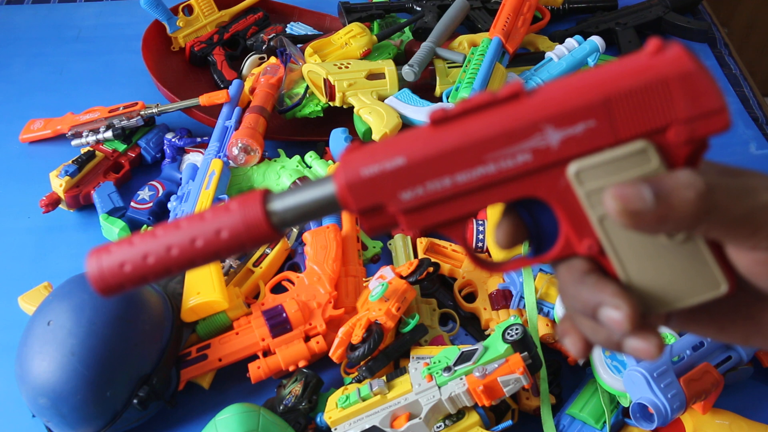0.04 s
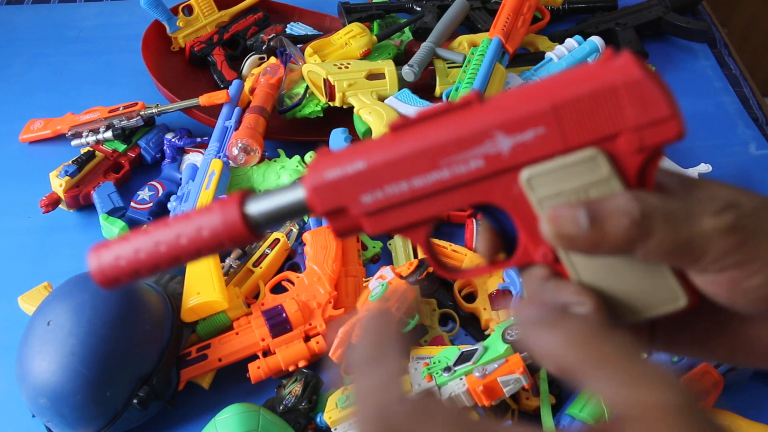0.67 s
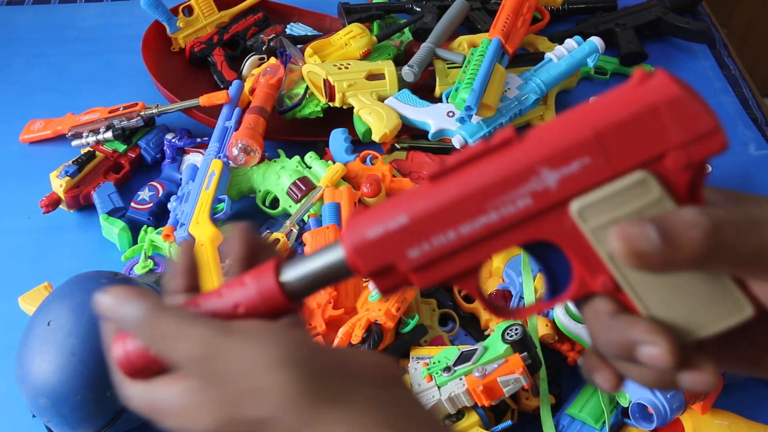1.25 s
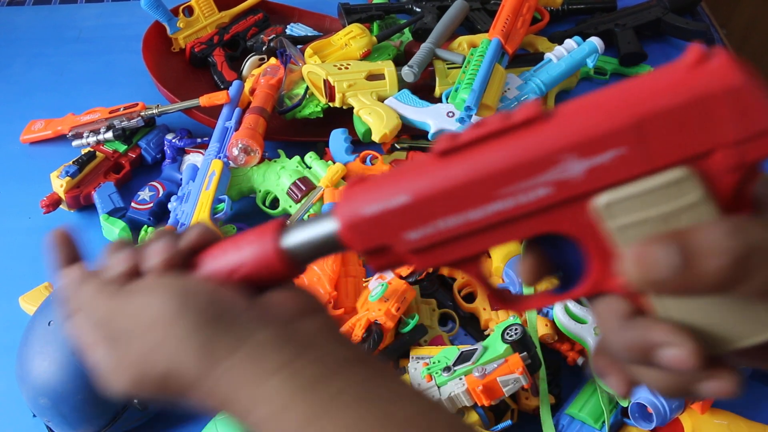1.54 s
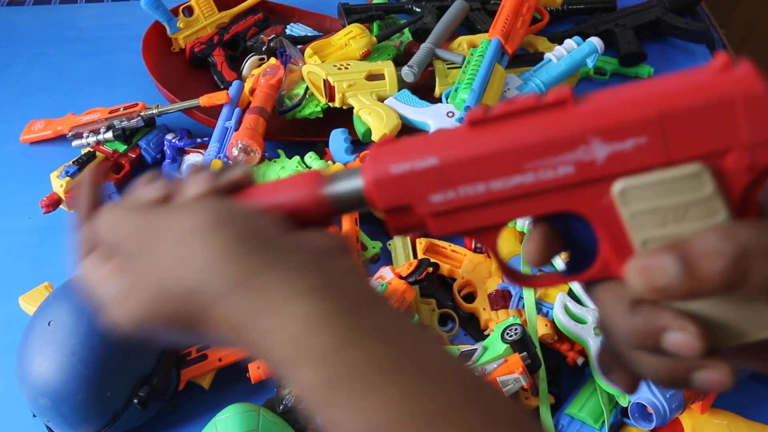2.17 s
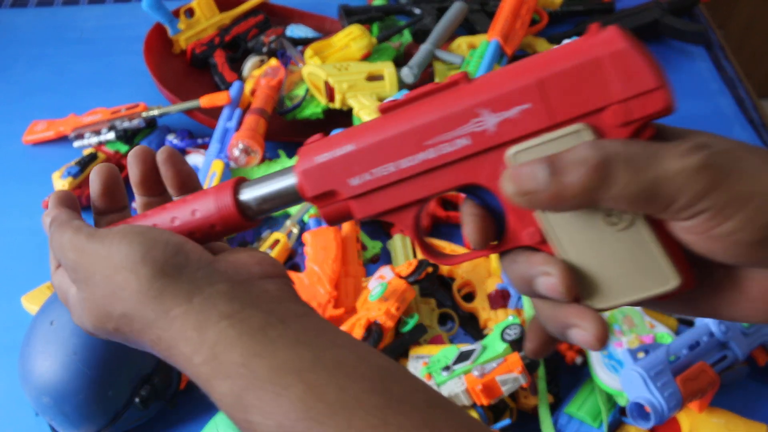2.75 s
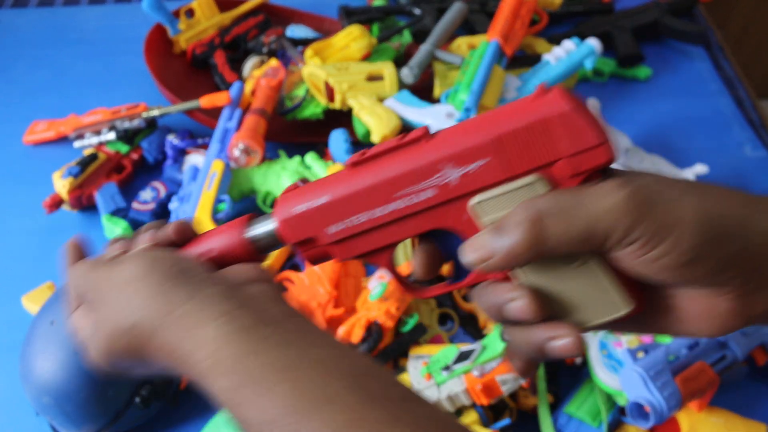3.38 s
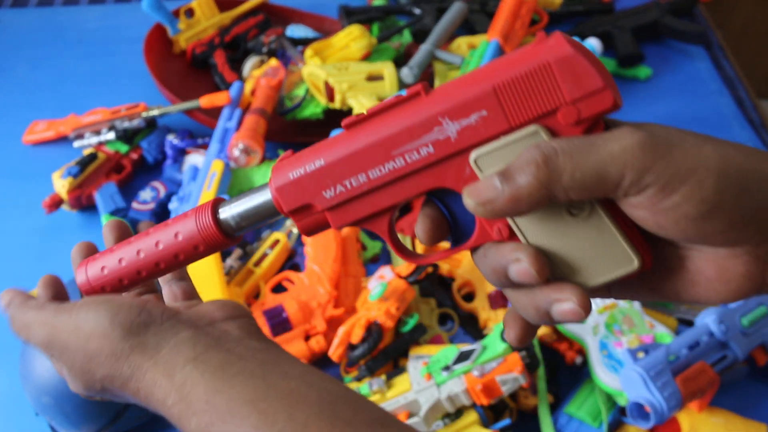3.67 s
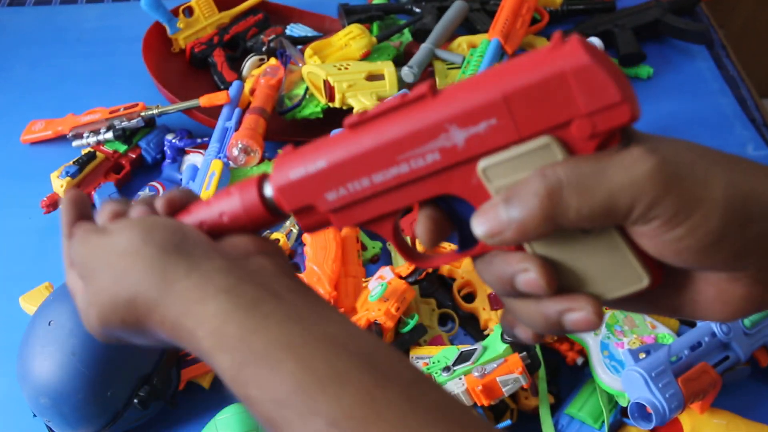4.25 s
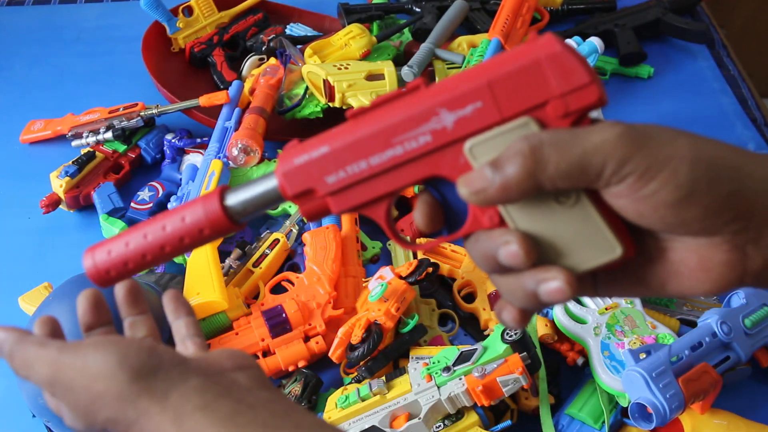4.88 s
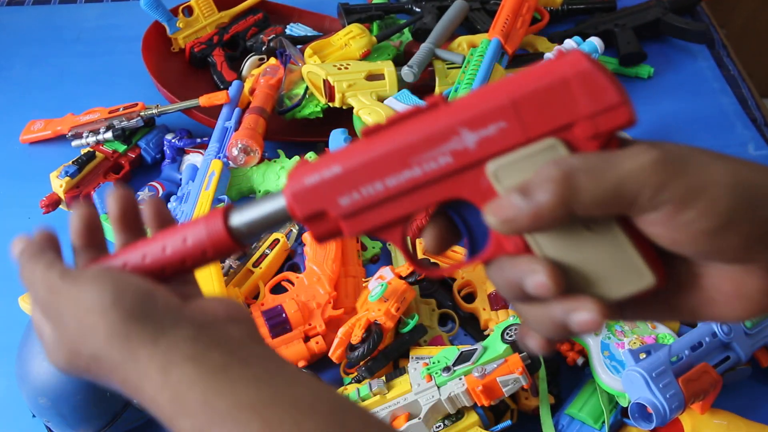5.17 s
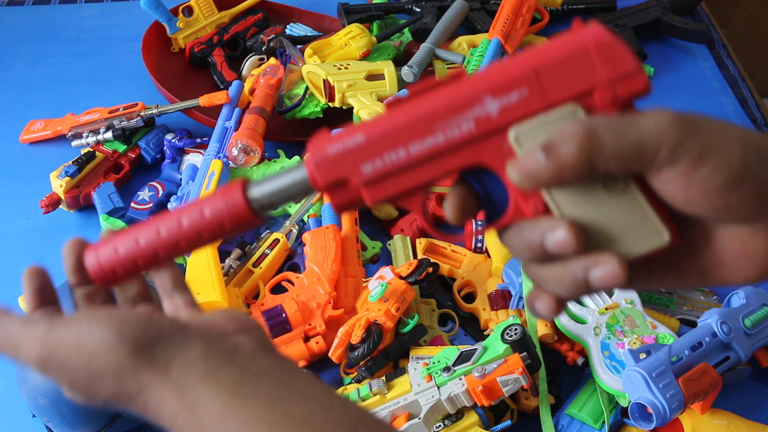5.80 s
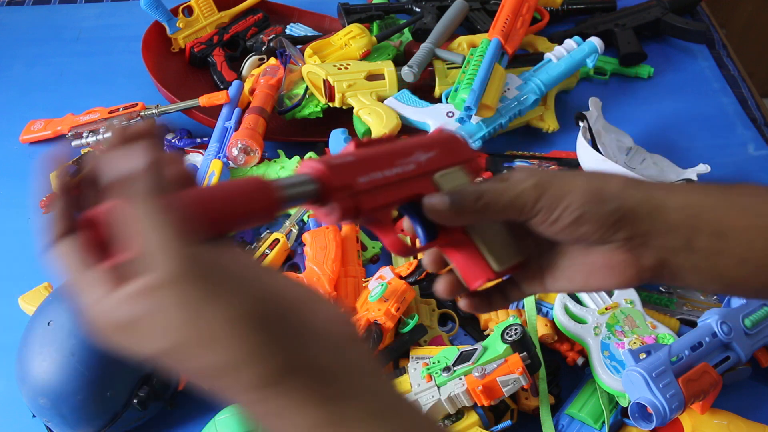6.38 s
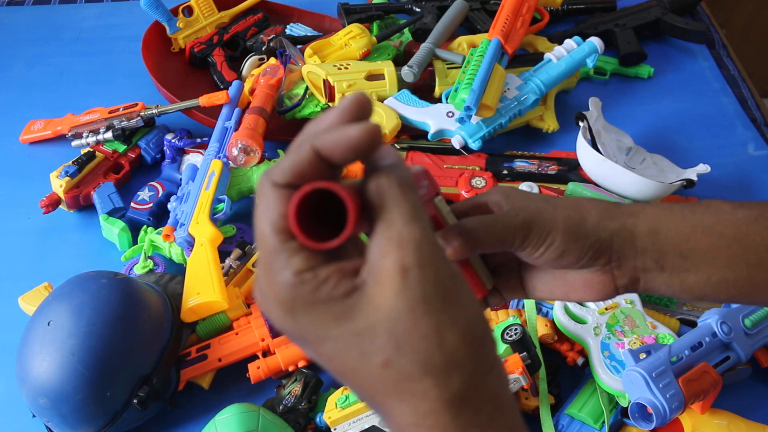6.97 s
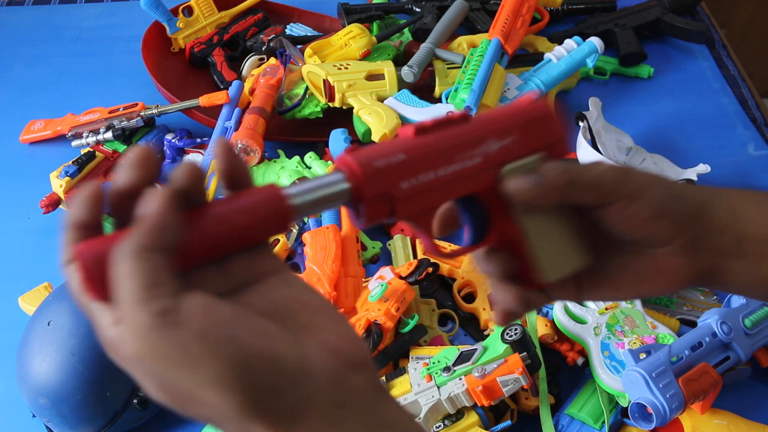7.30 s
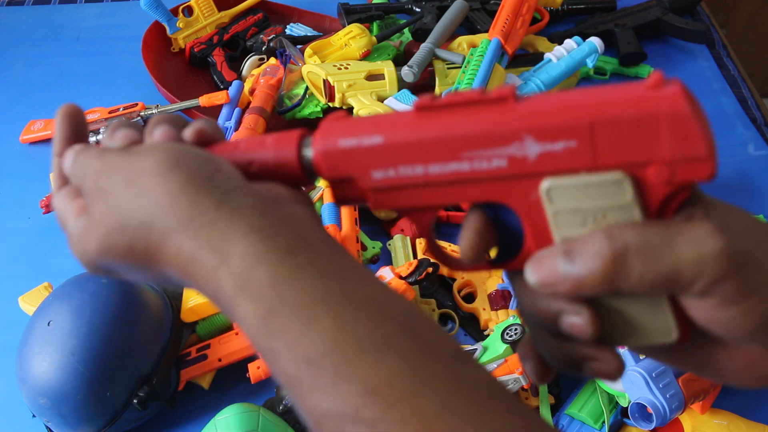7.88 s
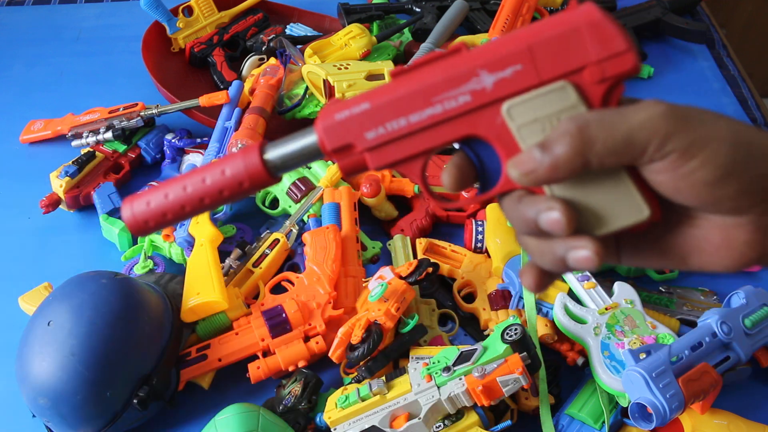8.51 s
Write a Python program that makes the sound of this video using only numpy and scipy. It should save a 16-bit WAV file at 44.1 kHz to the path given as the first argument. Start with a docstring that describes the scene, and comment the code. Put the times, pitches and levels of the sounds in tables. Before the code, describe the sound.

Close to the microphone in a faintly humming room, a toy spring pistol gives a few tiny clicks and two empty trigger snaps. Then come four rounds of hollow plastic clacks as the slide rubs back and forward, each ending in a sharp, loud shot with a brief echo. After some soft handling clicks, the trigger snaps empty again and the slide is pumped once more.

```python
"""A plastic spring pistol close to a stereo microphone in a faintly humming, hard-walled room.
Small dry clicks come first, then the trigger snaps twice on an uncocked spring.
The slide rubs and knocks back twice, runs forward, and a shot slams the piston home.
Three times more it is pumped, latches and fires; an empty snap and a last pump follow.
The limiter ducks on each loud blow and lifts the echo as it recovers."""
import sys
import numpy as np
from scipy import signal
from scipy.fft import rfft, irfft, next_fast_len
from scipy.io import wavfile

SR = 44100
rng = np.random.default_rng(int(sys.argv[2]) if len(sys.argv) > 2 else 0)


def file_out(sig):
    """Save sig as 16-bit WAV at sys.argv[1]."""
    # one column per channel
    cols = np.atleast_2d(sig).T
    # limit, then scale
    lim = np.clip(cols, -1, 1)
    pcm = np.round(lim * 32767).astype(np.int16)
    wavfile.write(sys.argv[1], SR, pcm)


N = 376613
HIT_SAMPLES = 8192
SIDE_SIGN = np.array([[1], [-1]])   # left, right

# plastic shell resonances: f/Hz, width/Hz, gain/dB over the bare crack
SHELL_MODES = [(577, 18, -5.5), (664, 97, -4), (824, 100, -2), (1001, 140, 0), (1386, 14, -12),
               (2120, 26, -18), (2713, 95, -2.5), (2940, 19, 5.5), (4860, 61, -22.5)]
# hollow slide resonances: f/Hz, width/Hz, gain/dB
SLIDE_MODES = [(553, 40, -3.5), (672, 280, 7), (995, 37, 9.5)]
# force of the slide on its stops: f/Hz, level/dB
KNOCK_FORCE = [(120, -34.5), (330, 8), (550, 3), (800, 5), (1100, -1), (1650, 1), (2400, 2), (3300, -2),
               (4800, -5.5), (6500, -13), (9000, -19.5), (12000, -25), (15000, -33.5)]
# brightness by contact: name, tilt/(dB/oct)
TILT_DB_OCT = {"slam": 2.17, "catch": -0.19, "take-up": -2.5, "break": -4.5, "pawl": .2, "bounce": 1.8,
               "hand": -0.5}


def from_db(db):
    return 10 ** (np.asarray(db) / 20)


def rms_one(x):
    return x / np.sqrt(np.mean(x ** 2) + 1e-20)


def at_hz(points, hz):
    """Interpolate a table over log frequency."""
    known, values = np.transpose(points)
    return np.interp(np.log(hz + 1), np.log(known), values)


def bins_hz(size):
    return np.arange(size // 2 + 1) * SR / size


def causal(db):
    """Minimum-phase response: nothing sounds before the blow."""
    cepstrum = np.fft.irfft(np.log(from_db(db)))
    half = len(cepstrum) // 2
    return np.exp(rfft(np.r_[cepstrum[:1], 2 * cepstrum[1:half], np.zeros(half)]))


def resonances(modes, hz):
    """Direct path plus damped resonators in parallel."""
    return 1 + sum(from_db(db) * 1j * hz * width / (f * f - hz * hz + 1j * hz * width)
                   for f, width, db in modes)


def diffuse(size, port_spacing_m=0.049):
    """Spectra of noise from all sides at two ports: alike in the bass, unrelated in the treble."""
    alike = np.sinc(2 * bins_hz(size) * port_spacing_m / 343)
    mid, side = rfft(rng.standard_normal((2, size)))
    return np.sqrt(1 + alike) * mid + np.sqrt(1 - alike) * side * SIDE_SIGN


def room_hum(air_db=-45, swell_hz=205):
    """Steady air with low drones, and a tone that swells three times."""
    # air spectrum: f/Hz, level/dB
    air_colour = [(25, -26), (60, -7), (110, -3), (300, 2.5), (500, -6.5), (900, -9), (2200, -14),
                  (4000, -21.5), (8000, -27.5), (16000, -33.5)]
    # droning resonances: f/Hz, width/Hz, gain/dB
    drones = [(110.8, 4.7, 6.5), (160.3, 3.16, 16), (202, 2.96, -4.5), (395.3, 10.3, 4.5)]
    # hum swells: t/s, half length/s, level/dB
    swells = [(3.62, 0.38, -48.5), (4.68, 0.15, -51), (6.43, 0.19, -42)]
    size, t = next_fast_len(N), np.arange(N) / SR
    hz = bins_hz(size)
    air = irfft(diffuse(size) * from_db(at_hz(air_colour, hz)) * resonances(drones, hz), size)
    swell = sum(from_db(db) * np.exp(-2 * ((t - s) / half) ** 2) for s, half, db in swells)
    return from_db(air_db) * rms_one(air[:, :N]) + swell * np.sqrt(2) * np.sin(2 * np.pi * swell_hz * t)


def room_echo(x, late_db, near_db, near_s, ceiling_db, ceiling_s):
    """One hard reflection, a quick cluster from things nearby and a diffuse tail."""
    # tail decay: f/Hz, T60/s
    t60 = [(250, 0.22), (800, 0.4), (2400, 0.41), (6000, 0.46), (15000, 0.31)]
    size = 2 ** 15
    t, hz, noise = np.arange(size) / SR, bins_hz(size), diffuse(size)
    centres_hz = np.geomspace(125, 16000, 8)
    echo = 0
    for centre, pick in zip(centres_hz, np.eye(len(centres_hz))):
        band = irfft(noise * at_hz(np.c_[centres_hz, pick], hz))
        echo = echo + band * from_db(-60 * t / at_hz(t60, centre))
    build_up = np.clip(t / .01, 0, 1) ** 2
    echo = echo * build_up * (from_db(late_db) + from_db(near_db) * np.exp(-t / near_s))
    echo[:, round(ceiling_s * SR)] += from_db(ceiling_db)
    return signal.fftconvolve(x.mean(axis=0)[None], echo, axes=1)[:, :N]


def crack(noise, smear_s):
    """Spectrum of one contact: a flat click, smeared as it passes through the parts."""
    age = np.arange(HIT_SAMPLES) / SR / smear_s
    burst = rfft(noise * age * np.exp(-age))
    power = abs(burst) ** 2
    return burst * causal(-10 * np.log10(power + .2 * power.mean()))


def blows(events, colour, modes, smear_s, scatter):
    """Contacts (t/s, level/dB, tilt/(dB/oct)) ring the modes; the treble differs at each port."""
    # stereo lean: f/Hz, gain/dB added left and taken off right
    lean = [(250, -0.5), (700, 0), (2200, 0), (4500, -2.24), (9000, -3)]
    hz, out = bins_hz(HIT_SAMPLES), np.zeros((2, N + HIT_SAMPLES))
    body = resonances(modes, hz) * from_db(at_hz(lean, hz) * SIDE_SIGN)
    spread = scatter * hz / (hz + 3500) * SIDE_SIGN
    unit = np.sqrt(.002 * SR / HIT_SAMPLES)   # level as if the energy were held for 2 ms
    octaves = np.log2(np.maximum(hz, 650) / 2000)
    for s, level_db, tilt in events:
        force = causal(at_hz(colour, hz) + tilt * octaves)
        mid, side = (crack(noise, smear_s) for noise in rng.standard_normal((2, HIT_SAMPLES)))
        hit = irfft(force * body * (mid + spread * side))
        start = round((s - smear_s / 2) * SR)
        out[:, start:start + HIT_SAMPLES] += from_db(level_db) * unit * rms_one(hit)
    return out[:, :N]


def near_clicks():
    """Small dry clicks right at the microphone."""
    # clicks: t/s, level/dB
    clicks = [(0.059, -32), (0.0706, -34), (0.0768, -31.5)]
    # click spectrum: f/Hz, level/dB
    force = [(300, -2), (2800, -7), (4000, 2), (5400, -13), (7500, -5), (9000, -20), (15000, -25)]
    return blows([(s, db, 0) for s, db in clicks], force, [], smear_s=.001, scatter=.96)


def shell_radiation(x, cutoff_hz=420):
    """The small shell radiates little bass."""
    return signal.sosfilt(signal.butter(2, cutoff_hz, "high", fs=SR, output="sos"), x)


def shell_ticks(events, smear_s=.0011, scatter=1.0):
    """Light contacts ring the shell."""
    # tick force: f/Hz, level/dB
    force = [(120, -55.5), (330, -12), (700, -2.5), (1300, 3), (3000, 7), (4500, 5), (7000, -3.5),
             (11000, -8), (15000, -17)]
    return blows(events, force, SHELL_MODES, smear_s, scatter)


def plastic_rub(rubs, unevenness_db=3.5, slips_per_s=3600):
    """Tiny slips drive the shell, pressing harder through each rub (start/s, end/s, level/dB)."""
    # friction force: f/Hz, level/dB
    force = [(100, -31), (400, -13), (800, 0), (1600, -0.5), (3500, -1.5), (7000, -6.5), (11000, -10),
             (16000, -19)]
    t, pressure = np.arange(N) / SR, np.zeros(N)
    for start, end, level_db in rubs:
        pressure += from_db(level_db) * np.interp(t, [start, end, end + .006], [0, 1, 0])
    slips = (rng.random(N) < slips_per_s / SR) * rng.standard_normal((2, N))
    slips *= from_db(-unevenness_db * np.minimum(rng.exponential(1, N), 4))
    size = next_fast_len(N)
    hz = bins_hz(size)
    response = from_db(at_hz(force, hz)) * resonances(SHELL_MODES, hz)
    mid, side = irfft(rfft(slips, size) * response, size)[:, :N]
    return pressure * rms_one(mid + .43 * side * SIDE_SIGN)


def handling():
    """Loose parts tick in the hand; the slide shifts in the grip."""
    # loose parts: t/s, level/dB
    loose_parts = [(0.727, -42), (2.012, -24.5), (2.374, -33), (6.495, -30.5), (6.569, -37.5), (6.921, -38)]
    # slide shifts: start/s, end/s, final level/dB
    shifts = [(7.131, 7.208, -40), (7.44, 7.637, -51)]
    ticks = [(s, db, TILT_DB_OCT["hand"]) for s, db in loose_parts]
    return shell_radiation(shell_ticks(ticks, smear_s=.0027, scatter=.89) + plastic_rub(shifts))


def slide_pulls(overrun_s=.02, catch_db=-.5, bounce_db=-4.5):
    """The slide breaks loose, rubs back and hits the rear stop, where it latches, bounces or rests."""
    # pulls: t/s at the stop, knock/dB, tilt/(dB/oct), travel/s, tick/dB, rub/dB, ending
    pulls = [(1.64, -12, 2.5, .063, -32.5, -39.5, "rests"), (1.969, -15.5, 3, .170, -23.5, -45, "rests"),
             (3.1963, -14, 2.5, 0.042, -27, -30.5, "latches"), (4.2518, -12.5, 2, .06, -40, -33, "latches"),
             (5.438, -13, 1.5, 0.077, -35, -33, "latches"),
             (7.8143, -10.5, 3.5, .0655, -30, -39.5, "bounces")]
    # latching force: f/Hz, level/dB
    latch_force = [(120, -51.5), (330, -28.5), (550, -16.5), (800, -12), (1100, -12), (1650, -6.5),
                   (2400, 1.5), (3300, -1.5), (4800, 1.5), (6500, -2.5), (9000, -1), (12000, -7.5),
                   (15000, -14.5)]
    # catch resonances: f/Hz, width/Hz, gain/dB
    catch_modes = [(1980, 220, -7.5), (2690, 130, -9), (3810, 83, 5)]
    ticks, rubs, knocks, catches = [], [], [], []
    for s, db, tilt, travel_s, tick_db, rub_db, ending in pulls:
        ticks.append((s - travel_s, tick_db, TILT_DB_OCT["break"]))
        rubs.append((s - travel_s, s + overrun_s * (ending == "latches"), rub_db))
        knocks.append((s, db, tilt))
        if ending == "latches":
            catches.append((s + overrun_s, catch_db, TILT_DB_OCT["catch"]))
        if ending == "bounces":
            knocks.append((s + overrun_s, db + bounce_db, TILT_DB_OCT["bounce"]))
    rear_stop = blows(knocks, KNOCK_FORCE, SHELL_MODES + SLIDE_MODES, smear_s=.0012, scatter=1.0)
    latch = blows(catches, latch_force, SHELL_MODES + catch_modes, smear_s=.00072, scatter=.98)
    return shell_radiation(shell_ticks(ticks) + plastic_rub(rubs) + rear_stop) + latch


def slide_returns(pawl_gap_s=.0076, first_tick_db=-6, rub_db=-41.5, bounce_share=.23):
    """The pawl ticks twice; the slide rubs forward, hits the front stop and bounces once."""
    # returns: t/s at the stop, knock/dB, tilt/(dB/oct), travel/s, pawl/dB, bounce/dB over the knock
    returns = [(2.255, -14.5, 4, .072, -21, -2.5), (3.465, -15.5, 4.5, 0.065, -21, -1),
               (4.5289, -13.5, 4.5, .0633, -20.5, -3), (5.7006, -14.5, 5, .075, -18.5, -2.5),
               (8.085, -16, 3, 0.093, -25.5, -15)]
    ticks, rubs, knocks = [], [], []
    for s, db, tilt, travel_s, tick_db, bounce_db in returns:
        start = s - travel_s
        ticks.append((start - pawl_gap_s, tick_db + first_tick_db, TILT_DB_OCT["pawl"]))
        ticks.append((start, tick_db, TILT_DB_OCT["pawl"]))
        rubs.append((start, s, rub_db))
        knocks.append((s, db, tilt))
        knocks.append((s + bounce_share * travel_s, db + bounce_db, TILT_DB_OCT["bounce"]))
    front_stop = blows(knocks, KNOCK_FORCE, SHELL_MODES + SLIDE_MODES, smear_s=.0009, scatter=.89)
    return shell_radiation(shell_ticks(ticks) + plastic_rub(rubs) + front_stop)


def piston(releases_s, flight_s=.0039, slam_db=17):
    """The released spring slams the piston home, ringing cylinder and shell."""
    # slam force: f/Hz, level/dB
    force = [(120, -53), (330, -11), (550, -10), (800, -3), (1100, -8), (1650, -9.5), (2400, -1),
             (3300, -10.5), (4800, -11.5), (6500, -22.5), (9000, -24), (12000, -26), (15000, -34.5)]
    # air cylinder and spring resonances: f/Hz, width/Hz, gain/dB
    cylinder_modes = [(1116, 44, 7), (2155, 72, 4), (2177, 270, -13.5), (4990, 166, -1.5)]
    slams = [(s + flight_s, slam_db, TILT_DB_OCT["slam"]) for s in releases_s]
    return blows(slams, force, SHELL_MODES + cylinder_modes, smear_s=.0005, scatter=.59)


def trigger(take_up_s=.033, tick_db=-34.5, rustle_db=-47.5):
    """The trigger ticks; a faint rustle rises just before the snap, which frees the piston if cocked."""
    # snaps: t/s, level/dB, tilt/(dB/oct), spring cocked
    squeezes = [(0.9596, -1.5, .5, False), (1.2818, -1.5, 1.5, False), (2.77, 2, 1.5, True),
                (3.8797, 5.5, 1.5, True), (5.0074, 7.5, 1.1, True), (6.0705, 12, 0.5, True),
                (7.1947, 2.5, 1.1, False)]
    # snap force: f/Hz, level/dB
    force = [(120, -36.5), (330, -22.5), (550, -16), (800, -10), (1100, -3), (1650, -2.5), (2400, -3.5),
             (3300, -1.5), (4800, -5), (6500, -5.5), (9000, -10.5), (12000, -14.5), (15000, -21.5)]
    # resonances of the trigger's small parts: f/Hz, width/Hz, gain/dB
    trigger_modes = [(1170, 120, -7.5), (2884, 110, -0.5), (4610, 52, 2.5)]
    ticks, lead_in_rustles, snaps, releases_s = [], [], [], []
    for s, db, tilt, cocked in squeezes:
        ticks.append((s - take_up_s, tick_db, TILT_DB_OCT["take-up"]))
        lead_in_rustles.append((s - take_up_s, s, rustle_db))
        snaps.append((s, db, tilt))
        if cocked:
            releases_s.append(s)
    snap = blows(snaps, force, SHELL_MODES + trigger_modes, smear_s=.00097, scatter=.96)
    return snap + piston(releases_s) + shell_radiation(shell_ticks(ticks) + plastic_rub(lead_in_rustles))


def scene():
    """The gun and its echo in the humming room."""
    gun = trigger() + slide_pulls() + slide_returns() + handling()
    echo = room_echo(gun, late_db=-34, near_db=-25.5, near_s=.0091, ceiling_db=-17, ceiling_s=.0083)
    return room_hum() + near_clicks() + (gun + echo) * from_db(.6 * SIDE_SIGN)


def limiter(x, threshold_db, release_db_per_s, attack_s):
    """The gain drops fast on a peak and climbs back at a steady rate."""
    over_db = np.maximum(20 * np.log10(abs(x).max(axis=0) + 1e-9) - threshold_db, 0)
    ramp_db = release_db_per_s * np.arange(N) / SR
    held_db = np.maximum.accumulate(over_db + ramp_db) - ramp_db
    pole = np.exp(-1 / (attack_s * SR))
    return x * from_db(-signal.lfilter([1 - pole], [1, -pole], held_db))


def record(dry):
    """Limiter, clipping of what slips past it, steep 16 kHz low-pass."""
    limited = limiter(dry, threshold_db=-1, release_db_per_s=128, attack_s=.001)
    low_pass = signal.ellip(10, .2, 80, 16000, fs=SR, output="sos")
    return signal.sosfilt(low_pass, np.clip(limited, -1, 1))


dry = scene()
out = record(dry)
file_out(out)
```